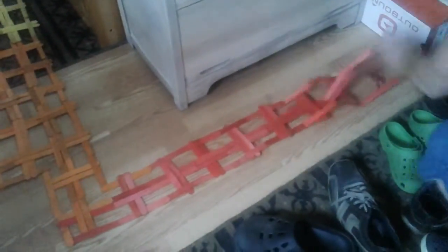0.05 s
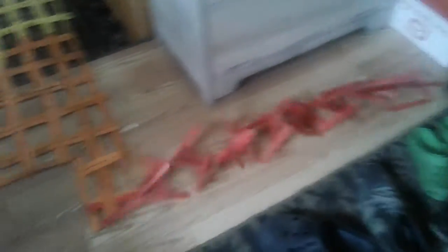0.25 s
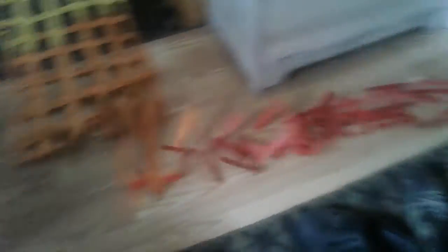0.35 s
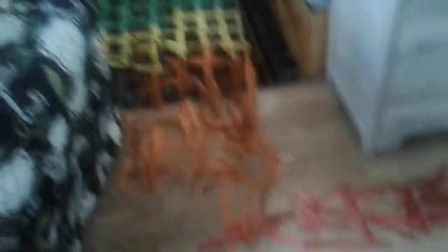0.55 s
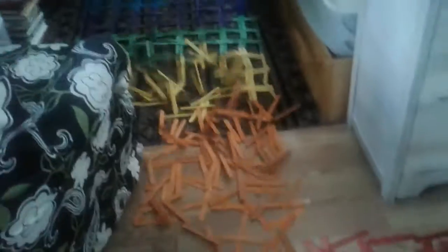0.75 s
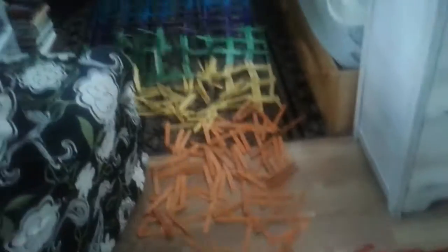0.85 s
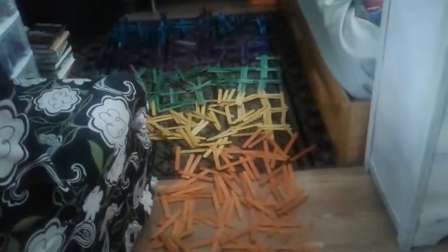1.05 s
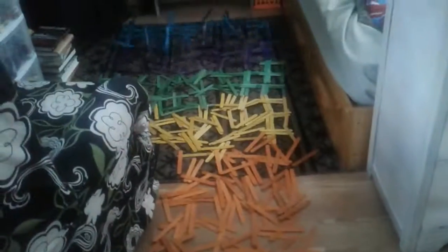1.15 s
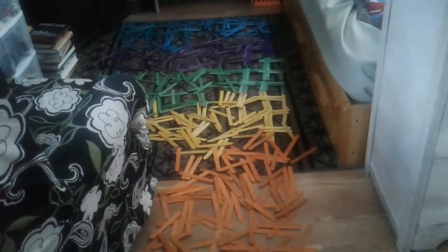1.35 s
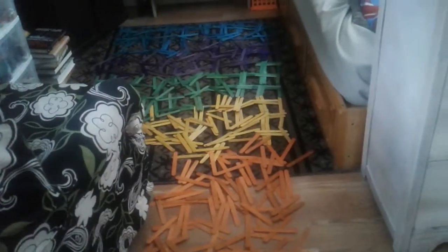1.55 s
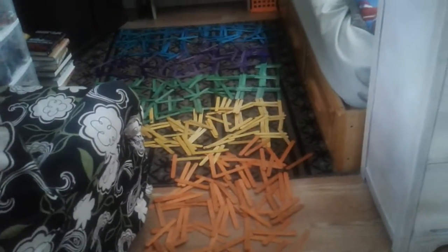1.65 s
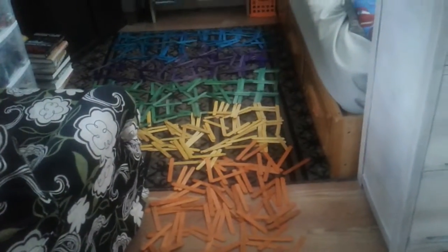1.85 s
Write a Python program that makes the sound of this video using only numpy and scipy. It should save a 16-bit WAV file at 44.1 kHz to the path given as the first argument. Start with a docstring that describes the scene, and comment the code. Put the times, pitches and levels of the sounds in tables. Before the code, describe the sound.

Wooden craft sticks spring apart in a quick, dense clatter across a hard floor, then settle.

```python
"""A few dull taps and ticks, then a dense clatter: a woven chain of wooden craft sticks is let go
indoors and springs apart. The sticks knock together in bursts, each one ticking and ringing briefly,
with a hard crack now and then. Some slap the boards and the floor thuds faintly. The clatter runs
from the hard floor onto a rug and the last sticks settle, in a room with short echoes and a faint hiss."""
import sys
import numpy as np
from scipy import signal
from scipy.io import wavfile
from scipy.ndimage import uniform_filter1d

SR = 44100
rng = np.random.default_rng(int(sys.argv[2]) if len(sys.argv) > 2 else 0)


def transcribe(signal):
    """Save signal, clipped to [-1, 1], as a 16-bit WAV file at the path in sys.argv[1]."""
    frames = np.atleast_2d(signal).T
    limited = np.clip(frames, -1, 1)
    pcm = np.round(limited * 32767).astype(np.int16)
    wavfile.write(sys.argv[1], SR, pcm)


N = 83790
T = np.arange(N) / SR


def amp(db):
    """Turns decibels into a gain."""
    return 10 ** (np.asarray(db) / 20)


def value_at(points, hz):
    """Looks up a table by pitch, on a logarithmic scale."""
    pitch_hz, value = np.transpose(points)
    return np.interp(np.log(hz + 1), np.log(pitch_hz + 1), value)


def loudness(points):
    """Turns rows of time and level into a gain for every sample."""
    return amp(np.interp(T, *np.transpose(points)))


def colour(x, tone, size=4096):
    """Makes some pitches stronger and others weaker; white noise would keep its power."""
    gain = amp(value_at(tone, abs(np.fft.fftfreq(size, 1 / SR))))
    gain = np.maximum(gain / np.sqrt(np.mean(gain ** 2)), 1e-5)
    spectrum = np.exp(np.conj(signal.hilbert(np.log(gain))))  # rings after a click, never before
    response = np.fft.ifft(spectrum).real
    return signal.fftconvolve(x, response[:size // 2])[:N]


def contacts(per_s, scatter_db, size=N):
    """Random clicks of very unequal strength, their power evened out over about 10 ms."""
    hits = rng.random(size) < per_s / SR
    strength = amp(scatter_db * np.minimum(rng.exponential(1, size), 4))
    clicks = hits * strength * rng.choice([-1, 1], size)
    power = abs(uniform_filter1d(clicks ** 2, 450))
    return clicks / np.sqrt(power + 1e-4)


def flurries(rows, per_s, scatter_db, rise_s=0.00035):
    """Each row is a quick swell of blows and a dying run of bounces."""
    out = np.zeros(N)
    for start_s, level_db, decay_s in rows:
        clicks = contacts(per_s, scatter_db, size=N // 4)[:np.sum(T < 6 * decay_s)]
        t = T[1:len(clicks) + 1]
        clicks[0] = np.sqrt(SR / per_s)  # always open with a blow
        clicks *= np.exp(-t / decay_s) * np.minimum(t / rise_s, 1) ** .5
        clicks *= amp(level_db) * np.sqrt(decay_s * SR / 2) / np.linalg.norm(clicks)
        part = out[round(start_s * SR):][:len(clicks)]
        part += clicks[:len(part)]
    return out


def release():
    """The first stick slips from under the hand and taps the floor."""
    # dull taps: start_s, level_db, decay_s
    taps = [(.056, -52, 0.0037), (.090, -38.5, 0.0021), (.0925, -34.5, 0.0023)]
    # tone of a tap: pitch_hz, level_db
    tap_tone = [(150, -9.5), (420, 3.5), (620, -0.5), (950, 2.5), (1500, -1.5), (2100, -11), (3500, -9.5),
                (6500, -9.5), (8000, -19), (10000, -30), (14000, -44.5)]
    return colour(flurries(taps, per_s=5400, scatter_db=2), tap_tone)


def ringing_sticks(clicks, count=500, size=1500, size_spread=0.244, tick_db=20):
    """Every click gives a dry tick and rings one of many slightly different sticks."""
    # notes of a mid-sized stick bending and twisting: pitch_hz, level_db, ring_s (time to fall 60 dB)
    stick_notes = [(747, -10, 0.037), (2052, -10, 0.027), (3007, -7, 0.019), (4056, -5.5, 0.024),
                   (5475, -9, .018), (6836, -3.5, 0.023), (9047, 0.5, .014), (11590, 4, 0.0086)]
    pitch_hz, level_db, ring_s = np.transpose(stick_notes)[:, :, None]
    which_stick = rng.integers(0, count, N)
    t, rings = T[:size], []
    fade = amp(level_db - 60 * t / ring_s)
    for k in range(count):
        size_shift = np.exp(size_spread * (2 * k / count - 1))
        own_hz = pitch_hz * size_shift * rng.uniform(.9, 1.1, pitch_hz.shape)
        signs = rng.choice([-1, 1], pitch_hz.shape)
        ring = (fade * signs * np.sin(2 * np.pi * own_hz * t)).sum(0)
        ring[0] += amp(tick_db)
        rings.append(ring / np.linalg.norm(ring))
    out = np.zeros(N + size)
    for at in np.flatnonzero(clicks):
        out[at:at + size] += clicks[at] * rings[which_stick[at]]
    return out[:N]


def clatter():
    """Sticks collide: dull as the weave slips, bright on the boards, softer on the rug, thin at last."""
    # steady clatter of sticks in the air: time_s, level_db
    steady_levels = [(0, -96), (.055, -75), (.125, -54), (.14, -40), (.204, -34), (.212, -18), (.32, -16),
                     (.41, -17), (.46, -15.5), (.58, -17), (.78, -17), (.93, -17.5), (1.05, -18.5),
                     (1.11, -21), (1.3, -19.5), (1.44, -21), (1.47, -25), (1.53, -25), (1.61, -31.5),
                     (1.68, -45.5), (1.81, -60), (1.9, -85.5)]
    # bunches springing free or landing: start_s, level_db, decay_s
    bunches = [(.1295, -30, 0.0014), (.187, -23.5, 0.0045), (.207, -10.5, 0.01), (.220, -7, 0.0033),
               (.230, -24, .012), (.267, -13, 0.013), (.289, -12, 0.025), (.344, -10, 0.0046),
               (.369, -12, 0.017), (.427, -11.5, 0.013), (.440, -14, 0.012), (.479, -11, 0.0096),
               (.485, -15, 0.0059), (.533, -12.5, 0.019), (.547, -17, 0.0061), (.599, -12, 0.02),
               (.641, -9.5, 0.016), (.681, -15.5, 0.0076), (.709, -16.5, 0.021), (.747, -13.5, 0.018),
               (.787, -14, 0.0078), (.802, -14, 0.015), (.839, -16, 0.013), (.854, -18.5, 0.017),
               (.894, -15.5, 0.032), (.954, -20, 0.0052), (1.018, -18.5, 0.018), (1.066, -17, .005),
               (1.144, -17.5, 0.021), (1.170, -23, 0.015), (1.222, -20, .008), (1.251, -15, 0.017),
               (1.276, -15.5, 0.025), (1.361, -20, 0.0067), (1.381, -20.5, 0.02), (1.425, -18.5, 0.019),
               (1.487, -21, 0.017), (1.508, -19, 0.022), (1.566, -19.5, 0.0099), (1.597, -19, 0.0051),
               (1.603, -18, 0.0073), (1.659, -34.5, .01), (1.704, -41, 0.023), (1.786, -46, .014)]
    # tone while slipping, on the boards, on the rug and settling far away: pitch_hz, level_db
    slipping_tone = [(200, -22), (600, -13.5), (1500, -11.5), (3000, -11.5), (5000, -1.5), (6800, -1),
                     (8500, -13.5), (10500, -25), (13000, -36), (15500, -39.5)]
    boards_tone = [(150, -38), (400, -19.5), (700, -18), (1500, -14.5), (2500, -13.5), (3700, -4),
                   (5200, -0.5), (6400, 1), (7500, -1), (8500, -8), (10000, -13.5), (11500, -22.5),
                   (13000, -28), (15500, -34)]
    rug_tone = [(150, -40), (400, -18.5), (750, -17.5), (1200, -16), (2400, -10), (3700, -2), (4600, 3),
                (5600, -2), (6700, 3), (7500, 0.5), (8500, -7), (10500, -14.5), (12700, -27.5),
                (15500, -32)]
    settling_tone = [(150, -41), (500, -27.5), (1300, -18.5), (2200, -12.5), (3500, -4.5), (4500, 0.5),
                     (5600, -3), (7000, 2.5), (8300, -6), (10500, -18.5), (12700, -29.5), (15500, -37)]
    steady = loudness(steady_levels) * contacts(per_s=2400, scatter_db=3)
    bursts = flurries(bunches, per_s=3000, scatter_db=2.5, rise_s=.003)
    wood = ringing_sticks(steady + bursts)
    # each stage goes from 0 to 1 at these times in seconds and takes over from the one before
    sprung = np.where(T > .21, 1, 0)
    on_rug = np.interp(T, [.77, 1.4], [0, 1])
    settling = np.interp(T, [1.42, 1.53], [0, 1])
    return ((1 - sprung) * colour(wood, slipping_tone)
            + (sprung - on_rug) * colour(wood, boards_tone)
            + (on_rug - settling) * colour(wood, rug_tone)
            + settling * colour(wood, settling_tone))


def cracks(decay_s=0.0023):
    """Now and then a stick hits another edge on."""
    # hard hits: start_s, level_db
    hits = [(.207, -16.5), (.345, -22), (0.409, -20), (.453, -9), (.505, -11.5), (.565, -13), (0.616, -22),
            (.716, -8), (0.722, -11), (.734, -11), (0.874, -19), (.958, -17), (1.026, -22.5), (1.068, -22),
            (1.562, -30)]
    # tone of a crack: pitch_hz, level_db
    crack_tone = [(300, -32.5), (900, -14.5), (2500, -20), (4500, -17), (7000, 5.5), (9000, 2),
                  (11500, -7.5), (13500, -19), (15500, -20)]
    rows = [(start_s, level_db, decay_s) for start_s, level_db in hits]
    blows = flurries(rows, per_s=1800, scatter_db=1)
    return colour(ringing_sticks(blows), crack_tone)


def floorboards():
    """Sticks slap the hollow-sounding boards, and all that lands makes the floor thud softly."""
    # slaps: start_s, level_db, decay_s
    landings = [(.208, -40, .012), (.272, -32, .03), (.339, -33, .01), (.374, -24, .014),
                (.384, -33, 0.0087), (.393, -25.5, .01), (.43, -41, .025), (.501, -34, .012),
                (.564, -38, .006), (.618, -38.5, .008), (.645, -32, .04), (.716, -30.5, 0.022),
                (.735, -32, 0.027), (1.003, -44, 0.03)]
    # thudding of the floor: time_s, level_db
    thud_levels = [(0, -79), (.1, -61), (.19, -56.5), (.25, -53), (.4, -50.5), (.55, -49.5), (.8, -52),
                   (1.05, -50), (1.17, -55.5), (1.35, -48.5), (1.53, -55.5), (1.7, -71), (1.9, -81.5)]
    # tone of a slap and of a thud: pitch_hz, level_db
    slap_tone = [(100, -18.5), (230, -9), (450, -10.5), (610, -1), (850, 1.5), (1100, -0.5), (1500, -7.5),
                 (2200, -4), (4000, -7.5), (8000, -20), (15000, -49.5)]
    thud_tone = [(25, -42.5), (48, -23), (62, -21.5), (95, -13.5), (130, 1.5), (175, -4), (240, -2),
                 (400, -11), (900, -35.5), (4000, -63)]
    slaps = colour(flurries(landings, per_s=1200, scatter_db=2), slap_tone)
    thuds = loudness(thud_levels) * colour(contacts(per_s=300, scatter_db=3), thud_tone)
    return amp(2) * slaps + thuds


def room(x, echo_count=8, echo_s=.009, echo_db=-7.5, tail_db=-5.5):
    """A few echoes off floor and furniture, then a short fading tail."""
    # how long the room rings: pitch_hz, ring_s (time to fall 60 dB)
    ring_times = [(150, 0.42), (1000, 0.47), (4000, 0.32), (8000, 0.23), (14000, 0.27)]
    t = T[:SR // 2]
    hz, time_s, noise = signal.stft(rng.standard_normal(len(t)), SR, nperseg=256)
    fade = amp(-60 * time_s / value_at(ring_times, hz)[:, None])
    tail = signal.istft(noise * fade, SR)[1][:len(t)] * np.minimum(t / echo_s, 1)
    echoes = np.zeros(len(t))
    signs = rng.choice([-1, 1], echo_count)
    delays = (SR * echo_s * rng.uniform(.05, 1, echo_count)).astype(int)
    echoes[delays] = signs / np.sqrt(echo_count)
    response = amp(tail_db) * tail / np.linalg.norm(tail) + amp(echo_db) * echoes
    return x + signal.fftconvolve(x, response)[:N]


def scene(places=6, rounds_per_s=7):
    """The sticks fly to different places, so the sound fades in turn through each place's echoes."""
    # background hiss and rumble: pitch_hz, level_db
    hush_tone = [(25, -7.5), (60, 8.5), (130, -3), (400, -3.5), (800, -11), (3000, -20.5), (7000, -33.5),
                 (15000, -31)]
    sound = amp(-5.5) * (clatter() + cracks()) + amp(-2) * floorboards() + amp(-3) * release()
    position = T * rounds_per_s * places
    heard = np.zeros(N)
    for place in range(places):
        distance = abs((position - place + 1) % places - 1)
        heard += room(sound * np.maximum(1 - distance, 0))
    heard += amp(-67) * colour(rng.standard_normal(N), hush_tone)
    return np.array([heard, heard])


def record(dry, ring_hz=6895, width_hz=825, boost_db=8.5, ceiling=.85, top_hz=15800):
    """The microphone's opening rings in the treble; peaks are rounded off and the highest pitches cut."""
    ring = signal.lfilter(*signal.iirpeak(ring_hz, ring_hz / width_hz, SR), dry)
    bright = dry + (amp(boost_db) - 1) * ring
    rounded = bright / (1 + abs(bright / ceiling) ** 8) ** (1 / 8)
    low_pass = signal.firwin(511, top_hz, window=("kaiser", 9), fs=SR)
    return signal.oaconvolve(rounded, low_pass[None], "same")


dry = scene()
out = record(dry)
transcribe(out)
```